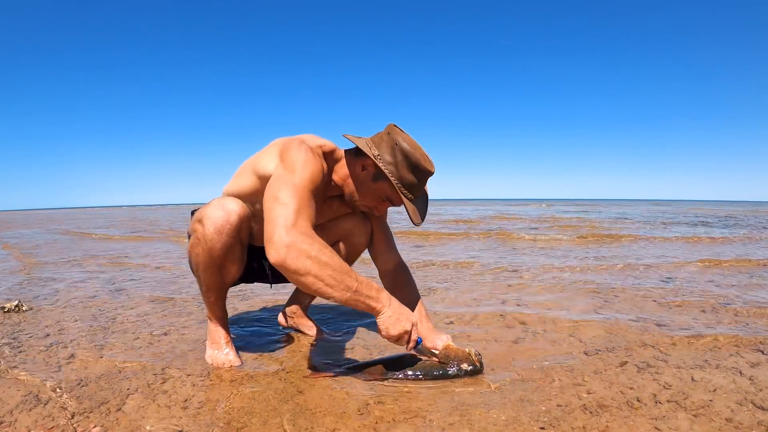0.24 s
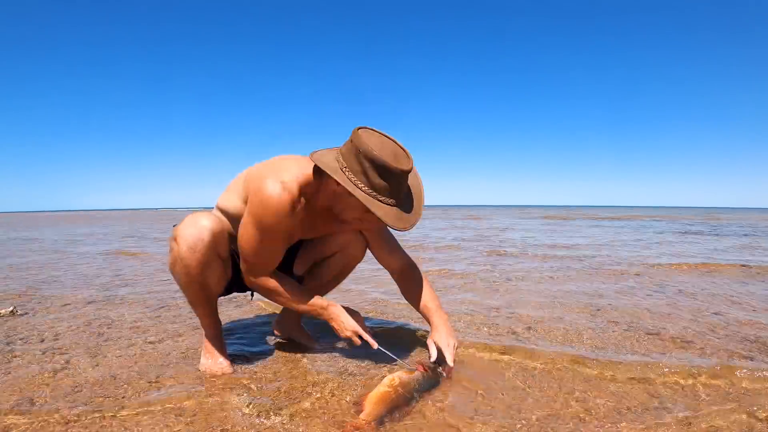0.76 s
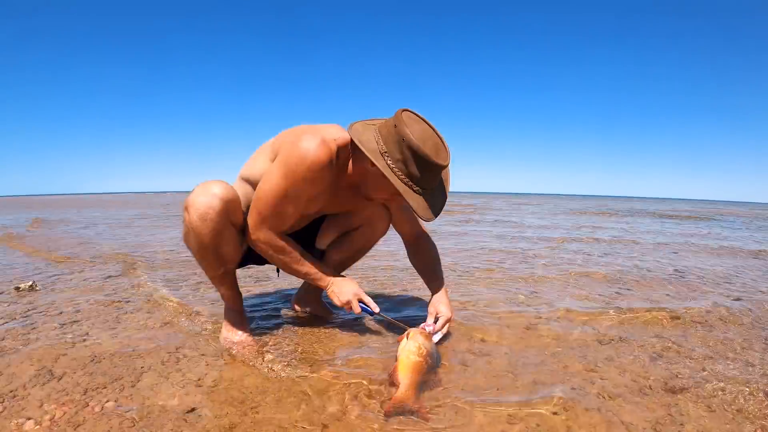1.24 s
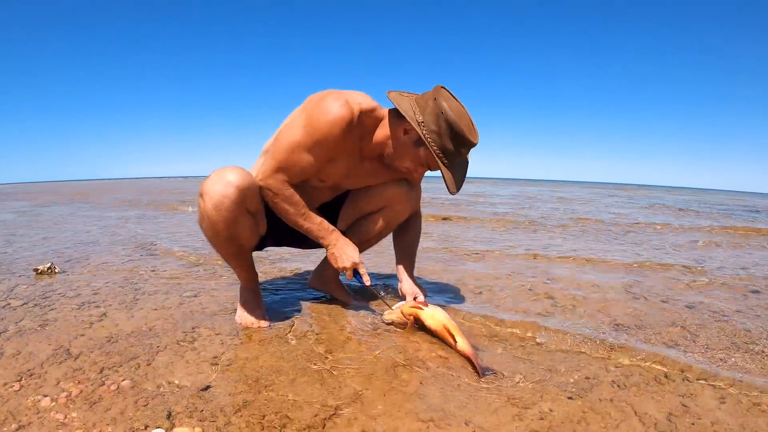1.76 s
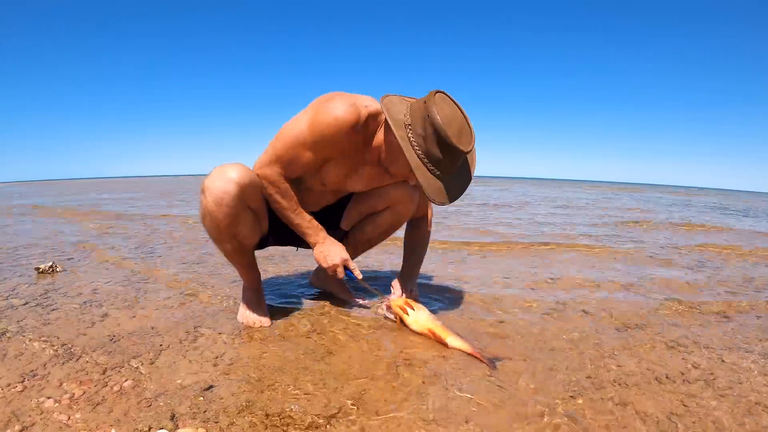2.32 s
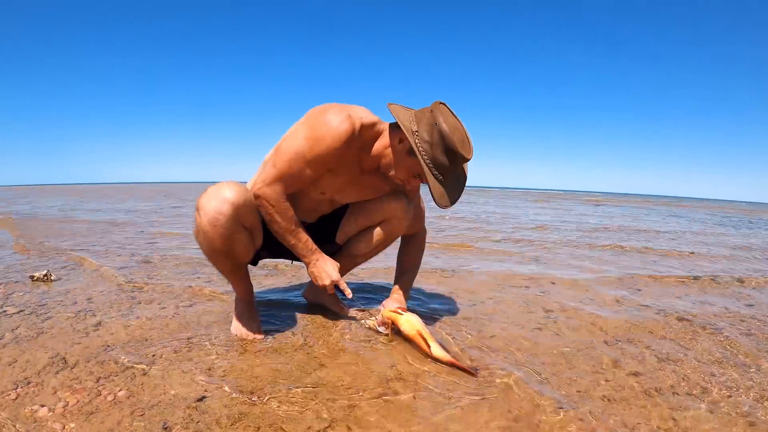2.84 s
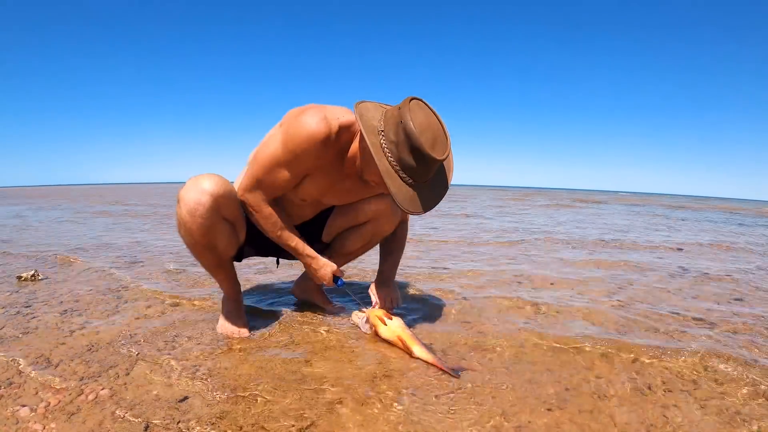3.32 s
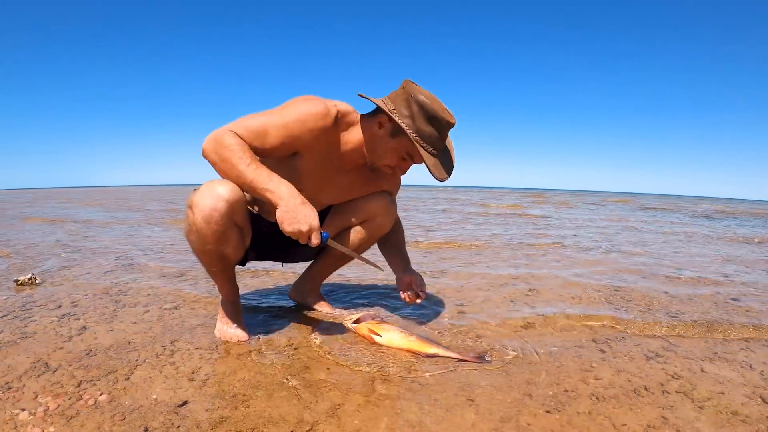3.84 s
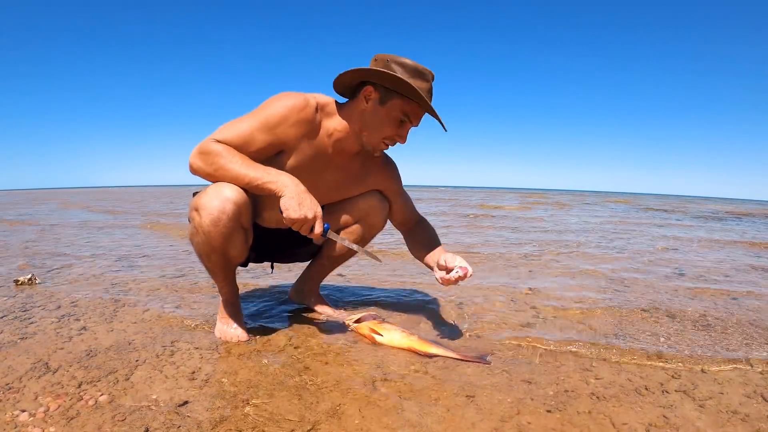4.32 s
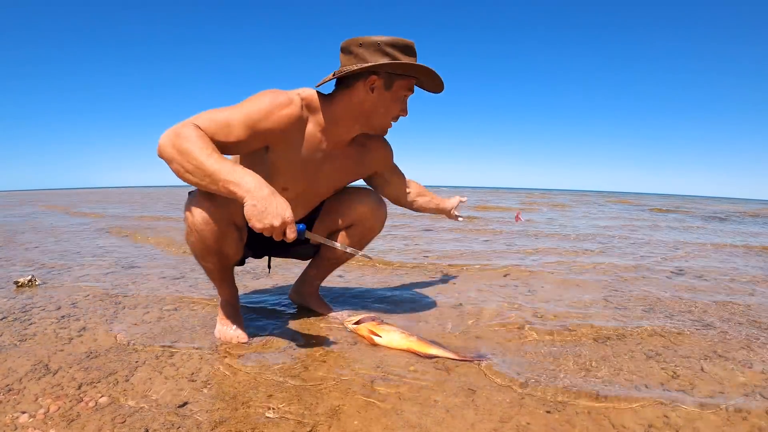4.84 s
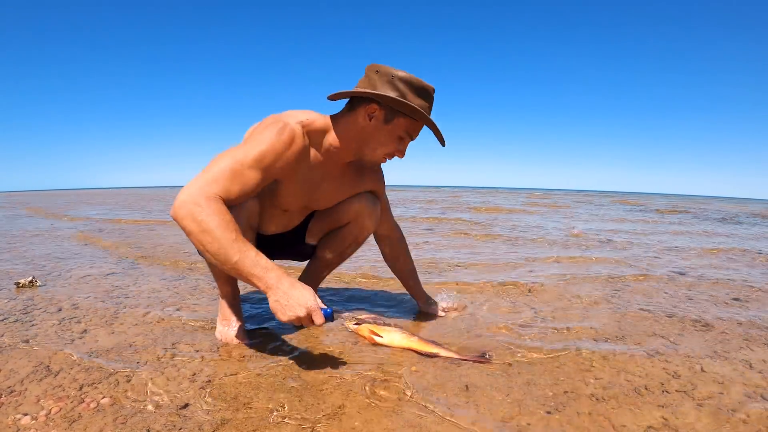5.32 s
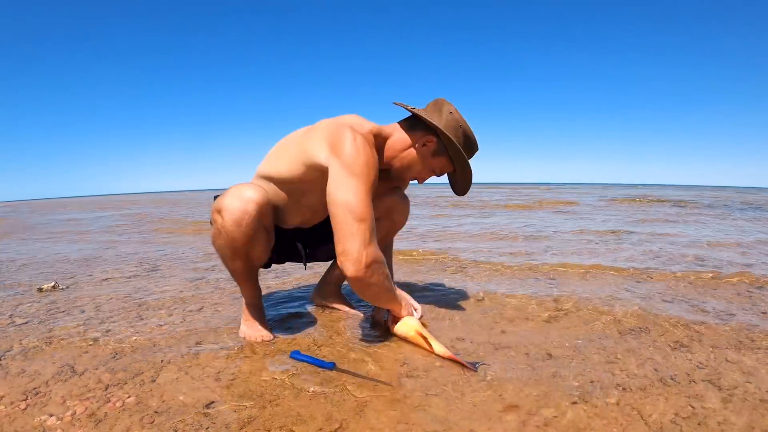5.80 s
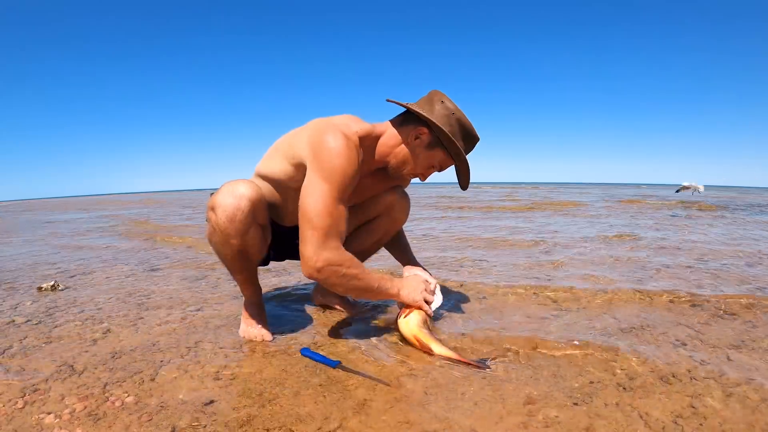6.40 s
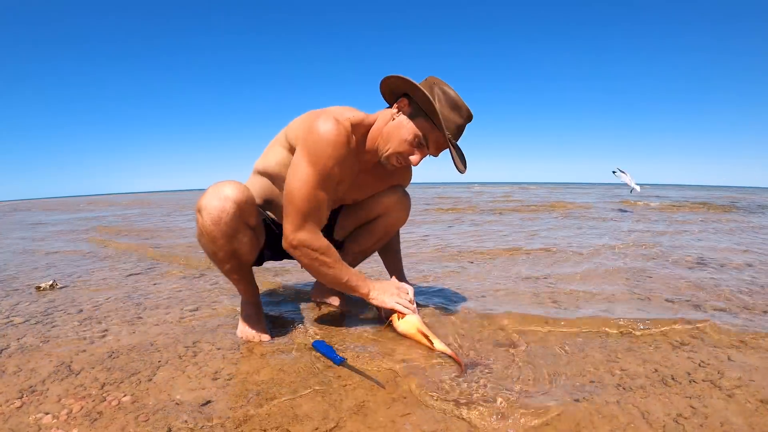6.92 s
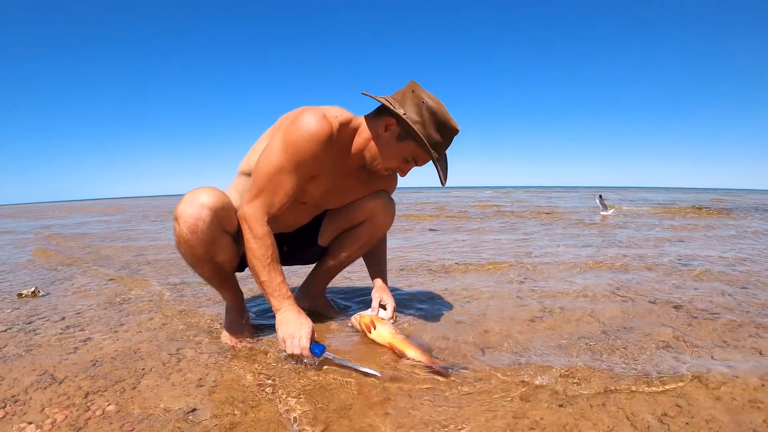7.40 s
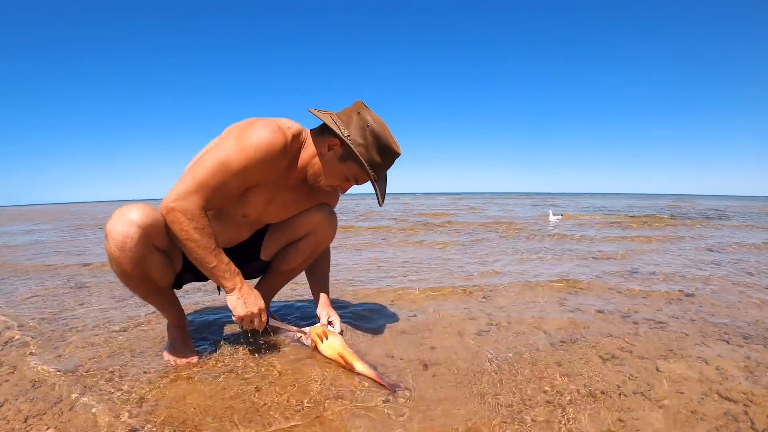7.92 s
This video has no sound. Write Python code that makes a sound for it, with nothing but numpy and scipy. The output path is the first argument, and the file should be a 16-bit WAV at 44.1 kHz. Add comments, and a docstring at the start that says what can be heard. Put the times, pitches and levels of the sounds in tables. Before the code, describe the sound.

Small wavelets lap on a flat shore, then very close wet fizzing, crunching and tearing of a fish being cut, then wind-buffeted splashes and drips.

```python
"""A fish is cleaned in ankle-deep seawater on a tidal flat. First wavelets wash by as noise and ringing
bubbles, low noise rumbles as wind on the microphone, and a splash pops as a puff of spray and bubbles.
From 0.5 to 3.75 s the cutting is very close: flesh fizzes with hiss and tiny rising squeaks, while runs
of clicks make the blade crunch and tear. Then the shore returns: gusts, splashes, bright puffs, plinks."""
import sys
import numpy as np
from scipy import signal
from scipy.fft import rfft, irfft, next_fast_len
from scipy.io import wavfile
from scipy.ndimage import uniform_filter1d

SR = 44100
rng = np.random.default_rng(int(sys.argv[2]) if len(sys.argv) > 2 else 0)


def to_wav(sig):
    """Store sig (one row per channel, or 1-D mono) as 16-bit WAV at the path in sys.argv[1].

    Samples outside -1..1 are clipped; the rate is SR.
    """
    pcm = np.clip(np.atleast_2d(sig), -1, 1) * 32767
    pcm = np.round(pcm).astype(np.int16)
    wavfile.write(sys.argv[1], SR, pcm.T)  # frames by channels


N = 359723
TIME = np.arange(N) / SR
OPPOSITE = np.array([[1], [-1]])   # a side signal enters left and right with opposite signs


def from_db(db):
    """Turns decibels into a gain."""
    return 10 ** (np.asarray(db) / 20)


def rms_one(x):
    """Scales a sound to an average (rms) level of 1."""
    return x / np.sqrt(np.mean(x ** 2) + 1e-20)


def in_time(rows):
    """Each column of a table as a signal, joined by straight lines."""
    s, *columns = np.transpose(rows)
    return [np.interp(TIME, s, column) for column in columns]


def at_hz(points, hz):
    """Reads a table of pitch and dB on a logarithmic pitch scale."""
    table_hz, table_db = np.array(points).T
    return np.interp(np.log(hz + 1), np.log(table_hz), table_db)


def band(x, low_hz, high_hz, order=2):
    """Keeps the sound between two pitches."""
    sos = signal.butter(order, [low_hz, min(high_hz, .47 * SR)], "band", fs=SR, output="sos")
    return signal.sosfilt(sos, x + 1e-18)


def coloured(x, spectrum):
    """Shapes a sound by a spectrum in dB."""
    size = next_fast_len(N)
    gain = from_db(at_hz(spectrum, np.fft.rfftfreq(size, 1 / SR)))
    return irfft(rfft(x, size) * gain, size)[..., :N]


def drift(rate_hz):
    """A slow random wander with spread 1, computed at every 40th sample."""
    r = np.exp(-80 * np.pi * rate_hz / SR)
    noise = rng.standard_normal(N // 40 + 2002)
    slow = signal.lfilter([1], [1, -2 * r, r * r], noise)[2000:]   # skips the filter's start
    return np.interp(np.arange(N) / 40, np.arange(len(slow)), rms_one(slow))


def evened(x, span):
    """Holds the level at 1 over span seconds, keeping the finer grain."""
    power = uniform_filter1d(x ** 2, max(int(span * SR), 8))
    return x / np.sqrt(np.abs(power) + 1e-12)


def clicks(per_s, spread_db):
    """Random impulses, mostly small and a few large."""
    sizes = from_db(spread_db * np.minimum(rng.exponential(1, N), 4)) * rng.choice([-1, 1], N)
    return sizes * (rng.random(N) < per_s / SR)


def widened(mid, side, likeness):
    """Two unrelated sounds make a stereo pair; likeness 1 puts the same sound on both sides."""
    likeness = np.clip(likeness, 0, 1)
    return np.sqrt((1 + likeness) / 2) * mid + np.sqrt((1 - likeness) / 2) * side * OPPOSITE


def add(out, s, sound):
    """Mixes a short sound in at a given second."""
    at = max(int(s * SR), 0)
    out[..., at:at + sound.shape[-1]] += sound[..., :max(N - at, 0)]


def heard(stretches):
    """1 within the stretches, 0 outside, with short fades inside both ends."""
    gain = 0
    for start, end, fade in stretches:
        gain = gain + np.clip((TIME - start) / fade, 0, 1) * np.clip((end - TIME) * 1000, 0, 1)
    return gain


def swells(rows, rise_db_per_s, fall_db_per_s):
    """Gain of a series of events: each rises to its level, holds from start to end and dies away."""
    power = 0
    for start, end, db in rows:
        below_db = rise_db_per_s * np.maximum(start - TIME, 0) + fall_db_per_s * np.maximum(TIME - end, 0)
        power = power + from_db(db - np.minimum(below_db, 90)) ** 2
    return np.sqrt(power)


def burst(hz, t60, width, rise):
    """A puff of noise around a pitch, peak 1, falling 60 dB in t60 seconds."""
    t = np.arange(int((t60 + .005) * SR)) / SR
    noise = rng.standard_normal(len(t)) * (1 - np.exp(-t / rise)) * from_db(-60 * t / t60)
    puff = band(noise, hz / (1 + width), hz * (1 + width))
    return puff / np.abs(puff).max()


def bubble(hz, t60, climb=0.087):
    """A trapped bubble rings and rises a little in pitch, peak 1."""
    t = np.arange(int(t60 * SR)) / SR
    tone = np.sin(2 * np.pi * hz * t * (1 + climb * t / t60))
    ring = tone * (1 - np.exp(-t / 0.00098)) * from_db(-60 * t / t60)
    return ring / np.abs(ring).max()


def squeak(hz, length, octaves, waver=0.12):
    """A shrinking air pocket rings at a climbing, unsteady pitch."""
    u = np.arange(int(length * SR) + 2) / (length * SR)   # 0 to 1 along the squeak
    steps = np.linspace(0, 1, num=8)
    bend, swell = (np.interp(u, steps, row) for row in rng.standard_normal((2, len(steps))))
    pitch = hz * 2 ** (octaves * u + waver * bend)
    outline = np.sin(np.pi * np.minimum(u, 1) ** 0.57) ** 2 * from_db(3.9 * swell)
    return outline * np.sin(2 * np.pi * np.cumsum(pitch) / SR) * (pitch < SR / 2)


def jerks(length_s, gap_s, decay_s, spread_db):
    """Stick and slip: the force lets go at once and at uneven gaps after that, dying away each time; rms 1."""
    kicks = np.zeros(int((length_s + decay_s) * SR) + 1)
    chance = rng.standard_normal((int(length_s / gap_s) + 2, 2))
    gaps = gap_s * np.exp(.4 * chance[:, 0])
    s = np.cumsum(gaps) - gaps[0]
    inside = s <= length_s
    kicks[(s[inside] * SR).astype(int)] = from_db(spread_db * chance[inside, 1])
    return rms_one(signal.lfilter([1], [1, -np.exp(-1 / (decay_s * SR))], kicks + 1e-18))


# wavelets building and ebbing: start_s, level_db, treble_db (-9.5 adds no extra treble)
WAVELETS = [(0.0, -32, -6), (0.3, -31, -8), (0.504, -27.5, -10), (3.79, -41, -7), (4.46, -40, -8),
            (4.85, -33.5, -10.5), (5.28, -35, -7.5), (5.53, -36, -2.5), (5.785, -35, -3.5),
            (5.83, -35, -9.5), (6.4, -35.5, -8.5), (6.85, -31, -8.5), (7.33, -29, -7), (7.476, -34, -9),
            (7.586, -30, -4.5), (7.8, -30.5, -8), (7.885, -35, -5.5), (8.15, -31, -10)]
# tone of the wavelets: pitch_hz, level_db
WAVELET_COLOUR = [(120, -12), (300, -11), (500, -5.5), (680, -3), (900, -3), (1600, 1.5), (2400, -3.5),
                  (3500, -10.5), (5000, -19.5), (7500, -28), (8800, -36.5), (10300, -46), (12600, -43),
                  (16000, -57)]
# stereo width of the shore, also used by the wind: start_s, side_to_middle_db before each source adds its own
SHORE_WIDTH = [(0.5, -10.5), (3.8, -29.5), (5.79, -65), (5.85, -30), (7.2, -16)]
# extra width of the wavelets, more for treble than bass: pitch_hz, side_gain_db
WAVELET_WIDTH = [(400, -4), (1000, -4), (4200, 9), (8000, 11.5), (13000, 15)]


def wash(bubble_db=0.0, cycles=14, patchy_db=1.97, lap_db=5.5):
    """Far wavelets blur into noise; near ones add separate bubbles in every band."""
    level_db, treble_db = in_time(WAVELETS)
    width_db, = in_time(SHORE_WIDTH)
    laps = from_db(lap_db * np.tanh(drift(7.2)))   # each lap sets off bubbles of all sizes together
    out, edges = 0, np.geomspace(150, 16500, 19)
    for low, high in zip(edges, edges[1:]):
        hz = np.sqrt(low * high)
        mid, side = band(rng.standard_normal((2, N)), low, high, order=3)
        bubbles = 0
        for pitch in np.geomspace(low, high, num=4)[:-1]:
            # clicks set off a resonance; high bubbles ring for more cycles
            r = from_db(-60 * pitch / (cycles * SR) / np.sqrt(1 + pitch / 2000))
            w = 2 * np.pi * pitch / SR
            hits = laps * clicks(60, 4.4) + 1e-18
            bubbles = bubbles + signal.lfilter([1, 0, -1], [1, -2 * r * np.cos(w), r * r], hits)
        near = from_db(bubble_db) * rms_one(band(bubbles, low / 2, high * 1.14))
        bright_db = (treble_db + 9.5) * np.clip(0.9 * np.log2(hz / 1500), 0, 1.5)
        gain_db = at_hz(WAVELET_COLOUR, hz) + patchy_db * drift(14.3) + bright_db
        gain = from_db(gain_db) * np.sqrt((high - low) / 1600)
        middle = rms_one(rms_one(mid) + near)
        sides = from_db(width_db + at_hz(WAVELET_WIDTH, hz)) * rms_one(side) * OPPOSITE
        out = out + gain * (middle + sides)
    return out * from_db(level_db)


# light breeze on the microphone between gusts: start_s, level_db
BREEZE_LEVEL = [(0.0, -42), (0.5, -48.5), (4.13, -49.5), (4.7, -34), (5.6, -36), (5.82, -48), (5.9, -32.5),
                (6.7, -45), (7.7, -45.5), (8.15, -39.5)]
# stronger gusts: start_s, end_s, level_db
GUST_EVENTS = [(0.26, 0.29, -36.5), (3.82, 3.84, -35), (3.968, 4.005, -29), (4.25, 4.365, -26),
               (4.588, 4.635, -29.5), (4.79, 4.995, -25.5), (5.198, 5.222, -19.5), (5.295, 5.385, -26.5),
               (5.476, 5.492, -24), (5.546, 5.568, -21), (5.666, 5.79, -20.5), (5.94, 6.03, -27),
               (7.06, 7.1, -41), (8.058, 8.09, -33.5)]
# tone of the rumble: pitch_hz, level_db
WIND_TONE = [(22, -36), (45, -40), (80, -0.5), (130, 2.5), (190, -7.5), (230, -10.5), (290, -25.5),
             (380, -26), (550, -30), (2000, -100)]
GUST_RISE_DB_PER_S, GUST_FALL_DB_PER_S = 600, 648


def wind(wider_db=13.0, flutter_db=3.0, apart_hz=90):
    """Eddies buffet the microphone in lumps, gusts over a breeze; the deepest rumble differs between the sides."""
    breeze_db, = in_time(BREEZE_LEVEL)
    width_db, = in_time(SHORE_WIDTH)
    gusts = swells(GUST_EVENTS, GUST_RISE_DB_PER_S, GUST_FALL_DB_PER_S)
    force = np.hypot(from_db(breeze_db), gusts)
    mid, side = evened(coloured(rng.standard_normal((2, N)), WIND_TONE), span=0.0432)
    side = band(side, 12, apart_hz, order=1)
    rumble = mid + from_db(width_db + wider_db) * side * OPPOSITE
    return rumble * force * evened(from_db(flutter_db * drift(35)), span=0.26)


# splashes around hands and knife, also used by the droplets:
# start_s, level_db (each part is set relative to it), bubble_pitch_hz
SPLASH_EVENTS = [(0.2522, -24.5, 2370), (4.8644, -21.5, 1680), (5.5081, -18, 1090), (5.527, -18, 1930),
                 (5.5362, -20.5, 2710), (5.546, -24.5, 750), (5.5967, -23, 1470), (5.6281, -21, 1254),
                 (5.682, -29, 2680), (6.9467, -27, 1295), (7.3153, -21, 1830), (7.3597, -19, 1160),
                 (7.3942, -19, 1315), (7.5564, -17, 2150), (7.584, -16.5, 2300), (7.6089, -18.5, 1740),
                 (7.654, -25, 1850), (7.69, -19, 1490), (7.706, -19, 1776), (7.7418, -20, 1405)]


def splashes(ring_s=0.035, spray_s=0.013, cloud_db=-11, cloud_s=.008, cloud_octaves=0.487):
    """Each splash is a puff of spray, one main bubble and a cloud of lesser ones."""
    out = np.zeros(N)
    for s, db, hz in SPLASH_EVENTS:
        add(out, s, from_db(db + 1.0) * bubble(hz, ring_s))
        add(out, s, from_db(db - 0.5) * burst(hz, spray_s, width=0.42, rise=0.00085))
        for delay, octave in zip(rng.exponential(cloud_s, size=9), rng.normal(0, cloud_octaves, size=9)):
            lesser = bubble(hz * 2 ** octave, ring_s * rng.uniform(0.64, 1))
            add(out, s + delay, from_db(db + cloud_db) * lesser)
    return out


# fine droplets: level below their splash, middle pitch, longest flight
DROPLET_DB, DROPLET_HZ, DROPLET_FLIGHT_S = -15, 2730, .11


def droplets(spread_octaves=0.47, mist_db=-22):
    """Every splash throws up a hiss of mist and fine droplets that patter back a moment later."""
    out = np.zeros(N)
    for s, db, _ in SPLASH_EVENTS:
        add(out, s, from_db(db + mist_db) * burst(5600, t60=0.086, width=0.67, rise=0.0023))
        for flight, octave in zip(rng.random(size=10), rng.standard_normal(size=10)):
            plink = bubble(DROPLET_HZ * 2 ** (spread_octaves * octave), t60=0.011)
            add(out, s + DROPLET_FLIGHT_S * flight, from_db(db + DROPLET_DB) * plink)
    return out


# when the cutting is heard, also used by the scene: start_s, end_s, fade_in_s
CLOSE_STRETCH = [(0.511, 3.750, .002)]
# juice squeezed from the flesh as the hand bears down: start_s, level_db (before a 0.5 dB lift)
JUICE_FLOW = [(0.515, -27), (0.66, -28.5), (0.77, -33.5), (0.88, -29.5), (1.06, -33.5), (1.12, -40.5),
              (1.27, -41), (1.45, -45.5), (1.79, -39.5), (1.84, -32.5), (2.01, -31.5), (2.2, -24),
              (2.31, -30), (2.45, -31.5), (2.56, -26.5), (3.02, -38.5), (3.66, -35.5), (3.743, -46.5)]
# sudden spurts of juice: start_s, end_s, level_db (before the same lift)
SPURT_EVENTS = [(1.297, 1.308, -38), (2.09, 2.125, -28), (2.362, 2.385, -27), (3.138, 3.15, -36.5),
                (3.245, 3.268, -29.5), (3.395, 3.405, -35), (3.512, 3.528, -29)]
# tone of the fizz: pitch_hz, level_db
JUICE_TONE = [(150, -70), (600, -21), (1500, -2), (2300, -10), (3000, -6.5), (4000, -8.5), (5700, -4.5),
              (6800, -5.5), (8200, 0), (11000, -1.5), (14500, 1.5), (16000, -8.5)]
# weight of the larger, lower-pitched bubbles: start_s, gain_db
LARGE_BUBBLE_WEIGHT = [(0.515, 3), (1.17, 3.5), (1.47, 5), (2.57, -6.5), (2.79, 0.5), (3.45, -8.5),
                       (3.74, 10)]
SPURT_RISE_DB_PER_S, SPURT_FALL_DB_PER_S = 702, 550


def juice(squeaks_per_s=700, squeak_db=-3.0, crackle_db=-4.0):
    """Wet flesh fizzes: a smooth hiss, bursting films and a swarm of tiny squeaks."""
    level_db, = in_time(JUICE_FLOW)
    large_db, = in_time(LARGE_BUBBLE_WEIGHT)
    swarm, (start, end, fade) = np.zeros(N), CLOSE_STRETCH[0]
    for when, pitch, length, size in rng.random((int(squeaks_per_s * (end - start)), 4)):
        tiny = squeak(2800 + 11000 * pitch, 0.0045 + 0.0058 * length, octaves=.4)
        add(swarm, start + when * (end - start), from_db(-4.2 * np.log(size + 0.005)) * tiny)
    swarm /= np.std(swarm[int(start * SR):int(end * SR)])
    hiss = rng.standard_normal(N) * from_db(1.8 * drift(73))
    films = from_db(crackle_db) * rms_one(clicks(1500, 1.7))
    fizz = hiss + films + from_db(squeak_db) * swarm
    mid, side = evened(coloured(np.array([fizz, rng.standard_normal(N)]), JUICE_TONE), span=0.093)
    fizz = widened(mid, side, 1 - 0.12 * np.clip((TIME - 1.65) / 0.54, 0, 1))
    large = signal.sosfiltfilt(signal.butter(2, 6300, fs=SR, output="sos"), fizz)
    spurts = swells(SPURT_EVENTS, SPURT_RISE_DB_PER_S, SPURT_FALL_DB_PER_S)
    flow = np.hypot(from_db(level_db), spurts)
    return from_db(0.5) * flow * (fizz - large + large * from_db(large_db))


# blade dragging lightly between strokes: start_s, level_db (before a 0.67 dB cut)
BLADE_DRAG = [(0.515, -37), (1.03, -31), (1.08, -45.5), (1.58, -49), (1.76, -36), (2.2, -38.5),
              (2.55, -41.5), (2.83, -34), (3.05, -52.5), (3.35, -28.5), (3.48, -43), (3.66, -27),
              (3.743, -41)]
# strokes of the blade through the fibres: start_s, end_s, level_db (before the same cut)
BLADE_STROKES = [(0.552, 0.613, -24.5), (0.648, 0.73, -28.5), (0.776, 0.795, -29), (0.868, 0.886, -25),
                 (0.955, 0.995, -32), (1.036, 1.056, -29), (1.138, 1.16, -35), (1.235, 1.265, -32.5),
                 (1.352, 1.366, -34.5), (1.41, 1.432, -38.5), (1.488, 1.502, -36), (1.636, 1.652, -35.5),
                 (1.748, 1.815, -28.5), (1.948, 1.962, -33), (2.03, 2.135, -29), (2.165, 2.235, -35),
                 (2.39, 2.445, -31), (2.607, 2.655, -32), (2.94, 2.953, -44), (3.45, 3.458, -33)]
STROKE_RISE_DB_PER_S, STROKE_FALL_DB_PER_S = 1099.5, 851
# the blade catching on fibres: typical gap, die-away time, spread of strength
CATCH_GAP_S, CATCH_DECAY_S, CATCH_SPREAD_DB = .009, .009, 2


def crunch(waver_db=2.0, late_likeness=.35):
    """The blade catches and fibres part in runs, knocking the damped body; it widens as the cut deepens."""
    drag_db, = in_time(BLADE_DRAG)
    strokes = swells(BLADE_STROKES, STROKE_RISE_DB_PER_S, STROKE_FALL_DB_PER_S)
    effort = np.hypot(from_db(drag_db + waver_db * drift(24)), strokes)
    fibres = np.array([clicks(2200, 1.75) for part in ("mid", "side")])
    runs = jerks(N / SR, CATCH_GAP_S, CATCH_DECAY_S, CATCH_SPREAD_DB)[:N]
    body = band(band(fibres * runs, 615, 1220), 302, 2500)
    mid, side = evened(body, span=0.041)
    likeness = 1 - (1 - late_likeness) * np.clip((TIME - 1.65) / 0.13, 0, 1)
    return from_db(-0.67) * effort * widened(mid, side, likeness)


# wet pockets snapping open: start_s, crack_level_db, pitch_hz
SNAP_EVENTS = [(0.541, -13.5, 12000), (0.559, -3.5, 13300), (0.65, -12, 13600), (0.725, -9, 14000),
               (0.856, -5, 9300), (0.9012, -5, 9500), (1.006, -15.5, 3300), (1.359, -17, 11800),
               (1.821, -11, 9800), (1.842, -16.5, 2170), (2.185, -11, 6700), (2.38, -8.5, 8750),
               (2.598, -11, 10200)]


def snaps(crack_s=0.0024, tail_s=0.017, tail_db=-8):
    """Snaps stand out of the fizz as a sharp crack with a short wet tail."""
    out = np.zeros(N)
    for s, db, hz in SNAP_EVENTS:
        add(out, s, from_db(db) * burst(hz, crack_s, width=.5, rise=.0005))
        add(out, s, from_db(db + tail_db) * burst(hz, tail_s, width=0.32, rise=.001))
    return out


# tough tissue giving way: start_s, end_s (3 ms is the shortest length), level_db (before a 1.34 dB lift)
TEAR_EVENTS = [(0.659, 0.687, -28), (0.724, 0.736, -26.5), (1.047, 1.056, -25.5), (1.224, 1.22, -32),
               (2.277, 2.287, -28.5), (2.41, 2.439, -26.5), (2.681, 2.704, -30.5), (2.711, 2.759, -25),
               (2.758, 2.8, -22.5), (3.224, 3.23, -29), (3.255, 3.279, -23.5), (3.316, 3.41, -26),
               (3.419, 3.421, -26.5), (3.553, 3.562, -30.5), (3.583, 3.59, -21.5), (3.603, 3.65, -21),
               (3.652, 3.67, -18.5), (3.672, 3.687, -22)]
# upper edge of a faint and of a hard tear, the level that counts as hard, steepness between them
TEAR_SOFT_HZ, TEAR_HARD_HZ, TEAR_HARD_DB, TEAR_BRIGHTENING = 1434, 3100, -20, 4.45
# tissue tearing in jerks: typical gap, die-away time, spread of strength
SLIP_GAP_S, SLIP_DECAY_S, SLIP_SPREAD_DB = .0065, 0.0028, 0.5
# the tearing moves to the right: from when, how fast, how far
PAN_START_S, PAN_DB_PER_S, PAN_LIMIT_DB = 2.27, 130, 32


def tears(low_spill_db=-33):
    """Tough tissue rips in jerks, the harder the brighter, with a faint low-frequency spill under each rip."""
    out = np.zeros((2, N))
    fibres = evened(clicks(6000, 3.0), span=0.0027)
    for start, end, db in TEAR_EVENTS:
        hardness = from_db(TEAR_BRIGHTENING * min(db - TEAR_HARD_DB, 0))
        top_hz = TEAR_SOFT_HZ + (TEAR_HARD_HZ - TEAR_SOFT_HZ) * hardness
        force = jerks(max(end - start, .003), SLIP_GAP_S, SLIP_DECAY_S, SLIP_SPREAD_DB)
        run = force * fibres[int(start * SR):][:len(force)]
        run = np.pad(run, (0, SR // 200))   # 5 ms for the filters to ring out
        low_spill = from_db(low_spill_db) * rms_one(band(run, 40, 300, order=1))
        rip = rms_one(band(band(run, 760, top_hz), 310, top_hz * 2.27)) + low_spill
        pan_db = np.clip(PAN_DB_PER_S * (start - PAN_START_S), 0, PAN_LIMIT_DB)
        left_right = rms_one(from_db(-pan_db * OPPOSITE / 2))
        add(out, start, from_db(db + 1.34) * left_right * rip)
    return out


# air squeaking out of narrowing slits: start_s, level_db (before a random swell), starting_pitch_hz, length_s
SQUEAK_EVENTS = [(0.858, -35, 7950, .009), (0.923, -30, 8200, 0.0077), (2.365, -38, 4180, 0.0084),
                 (3.14, -23.5, 6530, .009), (3.512, -25, 6080, 0.0095), (3.516, -21, 6760, 0.016),
                 (3.526, -23, 8240, 0.01)]


def squeaks():
    """Air squeezed through a narrowing slit makes a quick upward sweep."""
    out = np.zeros(N)
    for s, db, hz, length in SQUEAK_EVENTS:
        add(out, s, from_db(db) * squeak(hz, length, octaves=.9))
    return out


# short bright puffs of spray and small ticks: start_s, peak_db, pitch_hz, ring_time_s
PUFF_EVENTS = [(5.331, -24.5, 5140, 0.079), (5.439, -16, 4560, 0.075), (5.4533, -6.5, 3360, 0.004),
               (6.451, -28, 5400, 0.0082), (8.044, -31.5, 6700, 0.015)]


def puffs_and_ticks():
    """A puff of noise around one pitch; the shortest are heard as ticks."""
    out = np.zeros(N)
    for s, db, hz, t60 in PUFF_EVENTS:
        add(out, s, from_db(db) * burst(hz, t60, width=0.35, rise=0.0043))
    return out


# louder single drops plinking: start_s, peak_db, pitch_hz
DROP_EVENTS = [(5.686, -15, 2520), (7.241, -17, 2950), (7.497, -23, 3320), (7.531, -16.5, 3280),
               (7.557, -10, 2150), (7.621, -20, 4100), (7.655, -19, 3830), (7.808, -21.5, 3940),
               (7.887, -26, 3880), (7.952, -30.5, 6400)]


def drops():
    """Each single drop plinks as one short ringing bubble."""
    out = np.zeros(N)
    for s, db, hz in DROP_EVENTS:
        add(out, s, from_db(db) * bubble(hz, t60=0.011))
    return out


# when the shore is heard: start_s, end_s, fade_in_s
SHORE_STRETCHES = [(-1, 0.511, .001), (3.757, 5.790, .035), (5.800, 9, .04)]


def scene():
    """The shore in the open air, and between its stretches the cutting from very close."""
    shore = wash() + wind() + splashes() + droplets() + puffs_and_ticks() + drops()
    cutting = juice() + crunch() + snaps() + tears() + squeaks()
    return shore * heard(SHORE_STRETCHES) + cutting * heard(CLOSE_STRETCH)


CUTOFF_HZ = 16000


def record(dry):
    """The highest peaks are rounded and the top is cut steeply."""
    rounded = dry / (1 + (dry / .66) ** 4) ** .25
    return signal.sosfilt(signal.ellip(12, .1, 90, CUTOFF_HZ, fs=SR, output="sos"), rounded)


dry = scene()
out = record(dry)
to_wav(out)
```